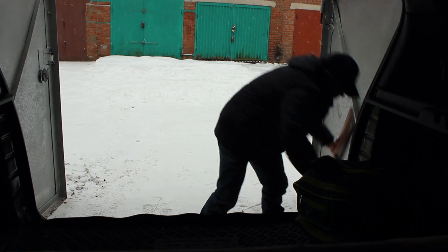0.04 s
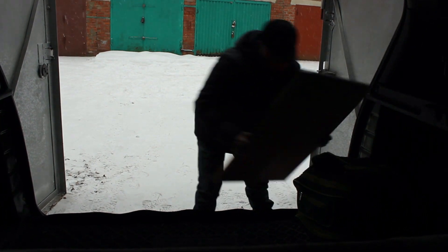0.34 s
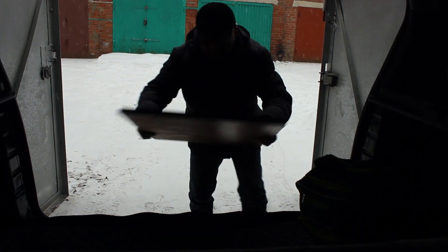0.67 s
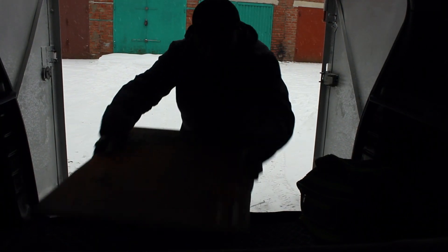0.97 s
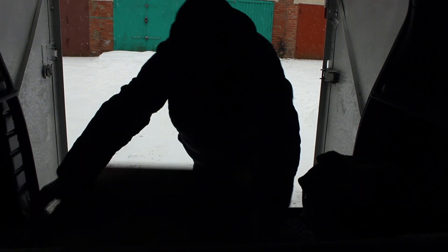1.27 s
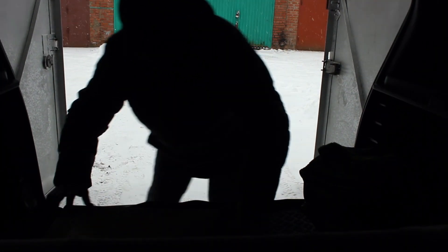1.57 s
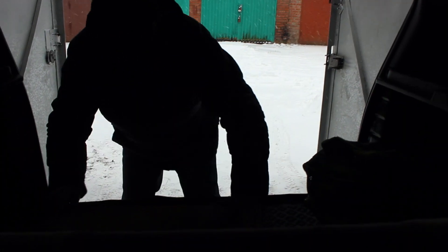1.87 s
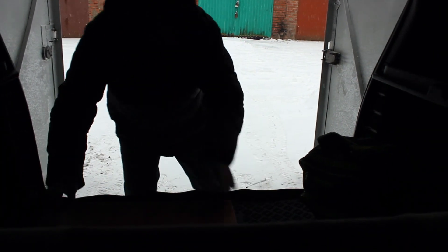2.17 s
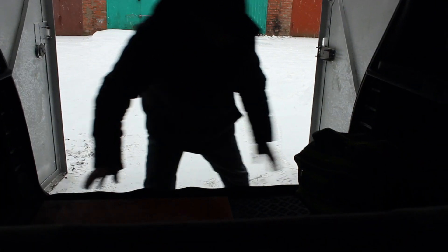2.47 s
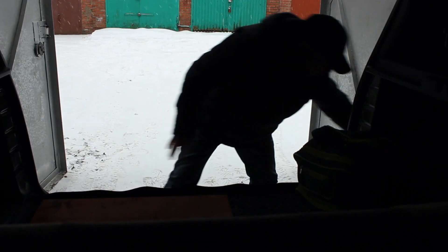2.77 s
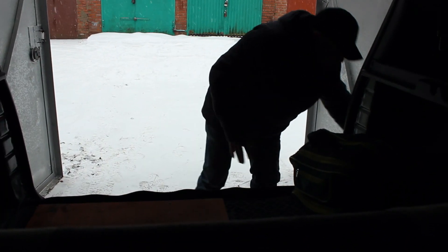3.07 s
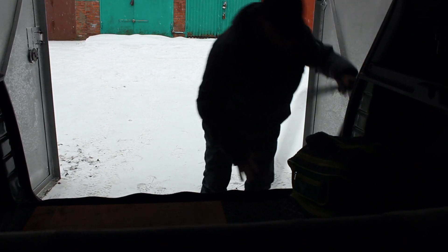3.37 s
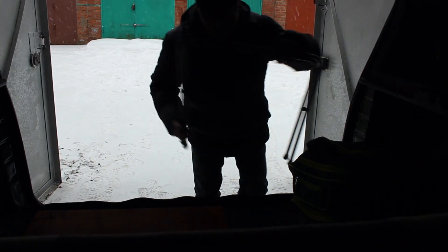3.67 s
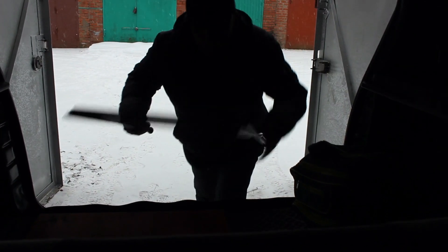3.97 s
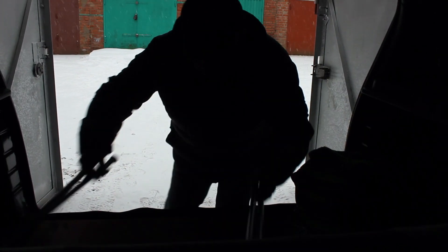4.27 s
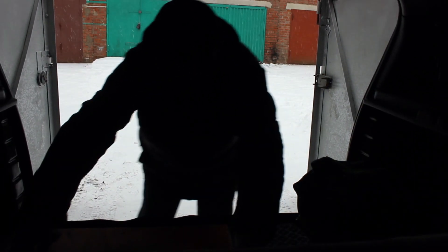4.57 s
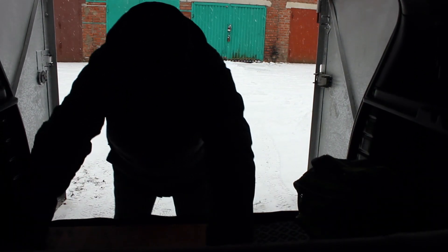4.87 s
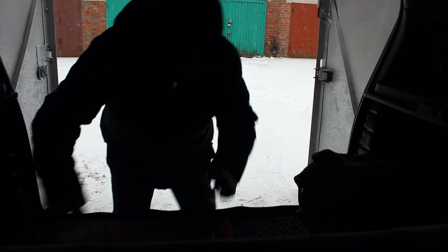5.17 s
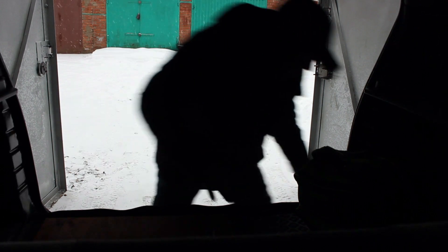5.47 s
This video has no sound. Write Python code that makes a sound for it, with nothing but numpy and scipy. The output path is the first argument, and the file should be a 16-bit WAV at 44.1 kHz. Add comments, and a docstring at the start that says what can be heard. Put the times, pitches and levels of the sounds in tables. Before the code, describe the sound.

From inside a van's cargo bay, over a low outdoor hush, someone is heard stepping on snow in a swishing nylon jacket. A plywood board booms on the floor, bounces and scuffs forward as the van rumbles and settles. After more steps, a folding steel frame clinks lightly in the hand, then lands on the wood with sharp clatters and a scrape. Close walls add a quick echo.

```python
"""Boots crunch on packed snow and a padded nylon jacket rustles, heard from inside a van's cargo bay.
A man drops a plywood board, which booms on the floor and shakes the van, then shoves it in so it judders.
He fetches a folding steel frame: its legs clink in his hands, then scrape and clatter on the board.
The close walls add a short echo, and the hardest blows overload the microphone."""
import sys
import numpy as np
from scipy import signal
from scipy.fft import rfft, irfft, next_fast_len
from scipy.io import wavfile

SR = 44100
rng = np.random.default_rng(int(sys.argv[2]) if len(sys.argv) > 2 else 0)


def generate_wav(signal):
    """Clip the signal to [-1, 1] and save it as 16-bit WAV at the path in sys.argv[1]."""
    frames = np.transpose(np.atleast_2d(signal))
    scaled = np.clip(frames, -1, 1) * 32767
    pcm = np.round(scaled).astype(np.int16)
    wavfile.write(sys.argv[1], SR, pcm)


N = 243873
TIME = np.arange(N) / SR
AGE = np.arange(SR // 4) / SR  # seconds since a contact
# Levels in dB are relative: the functions add their own gains. A fade time (t60) is a fall of 60 dB.

# The tone colour of each kind of noise. Each row: frequency in Hz, level in dB.
AIR_COLOUR = [(20, 11), (44, -31), (60, -9.5), (76, 11.5), (100, -7.5), (140, -3.5), (300, 0.5), (500, 0.5),
              (1030, -9), (1600, -2), (4200, -15.5), (8000, -15), (14000, -14), (16000, -30)]
HISS_COLOUR = [(1000, -30), (3500, 3.5), (6500, -2), (11000, -0.5), (16000, -5)]
NYLON_COLOUR = [(200, -6), (500, -8), (1100, -6), (1700, -1.5), (3500, -1.5), (6000, -6), (10000, -11),
                (16000, -15)]
SNOW_COLOUR = [(50, -46), (150, -5.5), (320, 0), (550, 0.5), (1100, -3.5), (1700, -0.5), (3000, -7),
               (7000, -25), (16000, -46.5)]
CREAK_COLOUR = [(60, -88), (160, -17.5), (300, 3), (520, 2), (900, -8), (2000, -69), (6000, -58)]
THUD_COLOUR = [(20, -22), (45, -22), (80, -5), (160, 1), (260, -2), (500, -7), (800, -15), (2000, -45)]
CLACK_COLOUR = [(200, 2.5), (500, -6), (1000, -13.5), (1600, 1.5), (3200, -5), (5000, -13.5), (7000, -19.5),
                (11000, -29), (16000, -26.5)]
GROAN_COLOUR = [(60, -22), (200, -13.5), (290, 3.5), (345, 3.5), (470, -1), (570, -10), (710, -11),
                (900, -10.5), (1300, -8.5), (2200, -40), (5000, -68)]
CLINK_COLOUR = [(900, -27), (1600, 1), (2300, -6), (3400, -1.5), (6000, -4), (9000, -16.5), (16000, -18)]
RUMBLE_COLOUR = [(15, 10), (25, 22), (42, 2.0), (90, 10.5), (250, -5), (500, -29.5), (900, -61)]
# The narrow tone colour of a squeak. Each row: multiple of its pitch, level in dB.
SQUEAK_COLOUR = [(0.5, -30), (0.68, -10), (1, 0), (1.1, -10), (3, -28)]

# How long the bay echoes. Each row: frequency in Hz, fade time in seconds.
ECHO_FADE = [(100, 0.28), (500, 0.15), (2000, 0.071), (12000, 0.06)]
# How wide the echo is. Each row: frequency in Hz, size of the left-right difference over the shared part.
ECHO_WIDTH = [(100, 0.0015), (1000, 0.0085), (4000, 0.057), (9000, 0.91)]
# The echo is weaker in the bass. Each row: frequency in Hz, relative gain.
ECHO_TONE = [(150, 0.23), (1200, 0.82)]

# The natural tones (modes) of the floor, the board, the whole steel frame and one free-hanging leg.
# Each row: pitch in Hz, level in dB, fade time in seconds before damping shortens it.
FLOOR_MODES = [(78, -6, .2), (97, -13, .28), (138, 2, .09), (163, 3, .1), (200, 2, .12), (262, -1, .22),
               (392, -6, .17), (492, -9, .13)]
BOARD_MODES = [(294, -39, 0.079), (338.6, 10, 0.14), (385, -26, 0.044), (456, -9, 0.23), (725, 3.5, 0.09),
               (970, -8, 0.031), (1120, -27, 0.088)]
FRAME_MODES = [(930, -2, 0.037), (1571, 5, 0.03), (1637, -2, 0.009), (1893, 6, 0.023), (2130, -13.5, 0.18),
               (2592, 1, 0.053), (2930, 3.5, 0.021), (3000, -0.5, 0.041), (3290, 6, 0.06), (3744, 0, 0.13),
               (4220, -9.5, 0.16), (4800, -7.5, 0.12), (5164, -16, 0.13), (5500, -13, 0.057),
               (6500, -15, 0.12), (6890, -6.5, 0.079), (8400, -9, 0.037)]
LEG_MODES = [(1655, -3, 0.18), (2700, -11, 0.33), (2676, 1.5, 0.1), (3310, 1, 0.12), (3450, -1, 0.13),
             (4080, -8, 0.46), (4500, -15, 0.075), (5320, -5, 0.2), (5740, -2, 0.098), (6650, -9.5, 0.12),
             (7250, -3, 0.023), (7860, -22.5, 0.2)]

# Four kinds of rubbing. Each row: start in seconds, length in seconds, level in dB.
SOFT_RUSTLES = [(.11, 0.5, -42.5), (.88, 0.33, -43), (1.22, 0.15, -33), (1.39, 0.18, -46),
                (1.72, 0.25, -36.5), (2.05, 0.5, -44), (2.6, 0.25, -49.5), (3.1, .25, -48), (3.45, .4, -53),
                (3.96, 0.93, -44), (5.14, .32, -46)]  # sleeves on the jacket, and a brief hiss trailing the board's landing
NYLON_SWISHES = [(1.289, 0.04, -27), (1.599, 0.068, -41), (2.288, 0.046, -39), (2.327, 0.052, -38),
                 (2.613, 0.085, -37), (2.771, 0.065, -42), (3.213, 0.04, -41), (3.962, 0.088, -34),
                 (4.584, 0.14, -35.5)]  # quick flicks of the cloth
SNOW_GRINDS = [(.12, 0.51, -38.5), (.55, 0.81, -48), (1.42, 0.17, -38), (1.77, 0.18, -33),
               (1.92, 0.37, -47.5), (3.12, 0.63, -50.5), (4.0, 0.45, -55), (4.41, 0.25, -46),
               (5.17, 0.3, -53.5)]  # soles and load grind over snow and grit
FRAME_SLIDES = [(4.25, 0.41, -54), (4.592, 0.14, -40.5), (4.8, 0.21, -34)]  # the frame slides on the plywood

# Snow gives under a boot. Each row: start in seconds, creak level in dB, crunch level in dB.
BOOT_STEPS = [(0.298, -34.5, -40), (.385, -28.5, -51), (0.488, -53, -41.5), (.846, -32, -38),
              (.904, -30, -38.5), (0.954, -27.5, -40), (3.22, -38.5, -42), (3.405, -43, -42.5),
              (3.456, -39.5, -43.5), (3.532, -35.5, -47), (3.668, -59, -54), (3.982, -34, -46),
              (5.507, -37.5, -44.5)]
# Snow, hinges and sliding feet squeak.
# Each row: start in seconds, length in seconds, pitch in Hz, level in dB.
SHORT_SQUEAKS = [(0.576, 0.037, 1940, -37.5), (0.814, 0.0095, 1740, -36), (0.827, 0.015, 1670, -34),
                 (0.996, 0.077, 1540, -40), (2.35, .049, 1750, -41), (2.428, .032, 1840, -35),
                 (3.813, 0.018, 2140, -38), (4.062, 0.026, 2200, -32.5), (4.098, 0.026, 1850, -34),
                 (4.628, 0.048, 1730, -25.5), (4.666, 0.019, 2230, -20.5)]
# Four kinds of short sound. Each row: start in seconds, level in dB.
CRUST_SNAPS = [(0.561, -39), (.66, -29.5), (0.759, -34), (2.09, -27), (3.534, -29.5), (3.609, -34.5),
               (3.669, -29.5)]  # the snow crust breaks
GRIT_TICKS = [(1.967, -33.5), (4.807, -45), (4.947, -34.5)]  # grit and fittings tick
DEEP_THUDS = [(0.715, -36.5), (4.561, -17.5), (4.963, -29)]  # a footstep, then the frame knocking on the floor
LEG_CLINKS = [(3.032, -29), (3.093, -22.5), (3.158, -35), (3.816, -43), (4.059, -31), (4.107, -44)]  # the frame is picked up and carried
# The van shakes on its springs. One row: start in seconds, level in dB, fade time in seconds.
BODY_SHAKE = (1.39, -32.5, 2.44)

# The frame strikes the board.
# Each row: start in seconds, thump level in dB, steel level in dB, seconds between bounces.
FRAME_LANDINGS = [(4.5584, -20.5, -19.5, 0.0035), (4.7142, -13, -14, 0.003), (4.722, -19.5, -5.5, 0.0022),
                  (4.737, -42, -11.5, 0.0036), (4.824, -31, -30.5, 0.008), (4.838, -23.5, -31, .005),
                  (4.937, -20, -37, .008), (4.9616, -10, -6.5, 0.0083)]
# Hard drops set a small hinge part singing.
# Each row: start in seconds, pitch in Hz, level in dB, fade time in seconds.
HINGE_PINGS = [(4.736, 10500, -42, .2), (4.970, 10500, -38, .3)]
# The board lands and bounces. Each row: start in seconds, thump level in dB, clack level in dB.
BOARD_LANDINGS = [(1.3696, -6, -8), (1.3726, 6, -7), (1.401, -15, -10), (1.419, -25, -18), (1.47, -15, -24),
                  (1.522, -24.5, -27.5)]
# The shoved board catches and slips. Each row: start in seconds, groan level in dB, scuff level in dB.
BOARD_SLIPS = [(1.298, -29.5, -32), (1.805, -48, -16), (1.823, -16.5, -20), (1.843, -26.5, -20.5),
               (1.881, -18.5, -26.5), (1.987, -18.5, -23.5), (2.17, -31, -33), (2.21, -30, -33),
               (2.229, -31.5, -45)]


def amp(db):
    """Turn decibels into a gain to multiply by."""
    return 10 ** (np.asarray(db) / 20)


def unit(x):
    """Scale a sound to an average (rms) level of 1."""
    return x / np.sqrt(np.mean(x ** 2) + 1e-20)


def along(points, hz):
    """Read between the rows of a (frequency, value) table, with octaves evenly spaced."""
    frequencies, values = np.transpose(points)
    return np.interp(np.log(hz + 1), np.log(frequencies), values)


def filtered(x, response):
    """Multiply each frequency in a sound by response(frequency)."""
    n = x.shape[-1]
    padded = next_fast_len(n + 2048, True)
    hz = np.fft.rfftfreq(padded, 1 / SR)
    return irfft(rfft(x, padded) * response(hz), padded)[..., :n]


def colour(x, spectrum):
    """Give a sound a tone colour, at an average level of 1."""
    return unit(filtered(x, lambda hz: amp(along(spectrum, hz))))


def add(track, start, sound):
    """Mix a sound into a track at a start time in seconds."""
    part = track[max(round(start * SR), 0):][:len(sound)]
    part += sound[:len(part)]


def fade(t60, attack):
    """The level after a hit: a quick rise, then a smooth fall (both times in seconds)."""
    return np.exp(-np.log(1000) * AGE / t60) * (1 - np.exp(-AGE / attack))


def burst(spectrum, t60, attack):
    """A dying puff of noise with the given tone colour."""
    return colour(rng.standard_normal(len(AGE)), spectrum) * fade(t60, attack)


def ring(modes, attack, damping):
    """An object rings, struck at a new spot each time, so its tones vary a little in level and pitch."""
    hz, db, t60 = np.transpose(modes)
    gain = amp(db + 2 * rng.standard_normal(len(hz)))
    signs = (-1) ** np.arange(len(hz))  # neighbouring tones start in opposite directions
    gain *= signs * np.sqrt(2) / np.linalg.norm(gain)
    hz = hz * (1 + .014 * rng.standard_normal(len(hz)))
    waves = np.sin(np.outer(2 * np.pi * hz, AGE))
    decays = np.exp(np.outer(-np.log(1000) * damping / t60, AGE))
    return (gain[:, None] * waves * decays).sum(0) * (1 - np.exp(-AGE / attack))


def grains(rate, spread_db):
    """Tiny random slips of uneven size, about `rate` of them a second."""
    clicks = (rng.random(N) < rate / SR) * rng.standard_normal(N)
    sizes = amp(spread_db * np.clip(rng.standard_normal(N), -2, 2))
    return unit(clicks * sizes)


def strokes(rows, rise_s, fall_s):
    """The level of rubbing: each stroke speeds up, holds and slows to a stop."""
    level = np.zeros(N)
    for start, length, db in rows:
        rising = (TIME - start) / rise_s
        falling = (start + length - TIME) / fall_s
        level += amp(db) * np.clip(np.minimum(rising, falling), 0, 1)
    return level


def bounces(start, db, gap_s, count, loss_db=7.5):
    """The times and levels of a hard contact and its ever weaker bounces."""
    return [(start + k * gap_s, db - k * loss_db) for k in range(count)]


def hush_and_hiss():
    """A low, steady outdoor hush, plus the microphone's own faint hiss, different in each channel."""
    hush = amp(-53) * colour(rng.standard_normal(N), AIR_COLOUR)
    hiss = amp(-63.5) * colour(rng.standard_normal((2, N)), HISS_COLOUR)
    return hush + hiss


def bay_echo(x, echo_db):
    """Add the quick echo of the close walls; left and right differ mainly in the treble."""
    hz, seconds, noise = signal.stft(rng.standard_normal((2, SR // 3)), SR, nperseg=256)
    dying = noise * np.exp(-np.log(1000) * seconds / along(ECHO_FADE, hz)[:, None])
    dying[1] *= along(ECHO_WIDTH, hz)[:, None]
    shared, side = signal.istft(dying, SR, nperseg=256)[1]
    tails = np.array([shared + side, shared - side]) / np.linalg.norm(shared)
    tails = filtered(tails, lambda f: along(ECHO_TONE, f))
    return x + amp(echo_db) * signal.fftconvolve(x[None], tails, axes=1)[:, :N]


def jacket():
    """Nylon rubs on nylon in many tiny slips; a swish starts fast and trails off."""
    rustles = strokes(SOFT_RUSTLES, rise_s=0.066, fall_s=0.11)
    level = np.hypot(amp(-52), rustles)  # the cloth still stirs between moves
    for start, length, db in NYLON_SWISHES:
        progress = np.linspace(0, 1, int(length * SR))
        add(level, start, amp(db) * np.sin(np.pi * progress ** .5) ** 2)
    return level * colour(grains(rate=9000, spread_db=-2), NYLON_COLOUR)


def snow():
    """Crystals crunch under the soles, and the crust gives way with dull creaks and snaps."""
    resting_feet = amp(-60.5)
    pressure = resting_feet + strokes(SNOW_GRINDS, rise_s=0.064, fall_s=0.13)
    fine_grit = grains(rate=1100, spread_db=1.5)
    crumbs = amp(-7.5) * grains(rate=60, spread_db=0.5)
    out = pressure * colour(fine_grit + crumbs, SNOW_COLOUR)
    for start, creak_db, crunch_db in BOOT_STEPS:
        creak = amp(creak_db + 8.5) * burst(CREAK_COLOUR, t60=0.082, attack=0.0057)
        crunch = amp(crunch_db + 6) * burst(CLACK_COLOUR, t60=0.089, attack=0.0015)
        add(out, start, creak + crunch)
    for start, db in CRUST_SNAPS:
        add(out, start, amp(db) * burst(SNOW_COLOUR, t60=0.036, attack=0.0012))
    return out


def squeaks():
    """Surfaces stick and slip at an unsteady rate, giving short, grainy chirps."""
    out = np.zeros(N)
    for start, length, hz, db in SHORT_SQUEAKS:
        spectrum = [(hz * multiple, level) for multiple, level in SQUEAK_COLOUR]
        tone = colour(rng.standard_normal(len(AGE)), spectrum)
        swell = np.hanning(int(length * SR))
        add(out, start, amp(db) * swell * tone[:len(swell)])
    return out


def grit_ticks():
    """Grit and fittings give small, sharp ticks under the load."""
    out = np.zeros(N)
    for start, db in GRIT_TICKS:
        add(out, start, amp(db) * burst(HISS_COLOUR, t60=0.13, attack=0.0001))
    return out


def body_shudder():
    """After the board lands, the van's body rumbles and settles."""
    out = np.zeros(N)
    start, db, t60 = BODY_SHAKE
    rumble = colour(rng.standard_normal(N), RUMBLE_COLOUR)
    add(out, start, amp(db) * rumble * np.exp(-np.log(1000) * TIME / t60))
    return out


def panel_bass_loss(x):
    """Panels push little air below their lowest tone, so the deepest bass drops away."""
    return signal.sosfilt(signal.butter(4, 56, "high", fs=SR, output="sos"), x)


def deep_thuds():
    """Deep, dull thuds, each one low dying tone: a footstep, then the frame knocking on the floor."""
    out = np.zeros(N)
    lowest_hz = FLOOR_MODES[0][0]
    thud = np.sqrt(2) * np.sin(2 * np.pi * lowest_hz * AGE) * fade(t60=0.1, attack=0.0012)
    for start, db in DEEP_THUDS:
        add(out, start, amp(db) * thud)
    return out


def floor_thump():
    """The floor panel booms under one dull slap."""
    boom = ring(FLOOR_MODES, attack=.0015, damping=1.35)
    slap = amp(-2) * burst(THUD_COLOUR, t60=.035, attack=.001)
    return boom + slap


def frame_scrape():
    """Steel feet drag on the wood, and the floor rumbles beneath."""
    rasp = colour(grains(rate=1600, spread_db=0.5), CLACK_COLOUR)
    rumble = amp(-9.5) * colour(rng.standard_normal(N), THUD_COLOUR)
    return strokes(FRAME_SLIDES, rise_s=0.0058, fall_s=0.019) * (rasp + rumble)


def steel_frame():
    """Hinged steel legs clink brightly in the hand, then clatter on the board, which damps them."""
    out = np.zeros(N)
    for start, db in LEG_CLINKS:
        tube = ring(LEG_MODES, attack=.002, damping=1.5)
        tap = burst(CLINK_COLOUR, t60=.075, attack=.002)
        add(out, start, amp(db) * (tube + tap))
    for start, thump_db, steel_db, gap_s in FRAME_LANDINGS:
        knock = ring(FLOOR_MODES[2:], attack=0.002, damping=3.4)  # without the two deepest tones
        thud = amp(-4.5) * burst(THUD_COLOUR, t60=.05, attack=.001)
        wood = amp(steel_db - 6.5) * burst(GROAN_COLOUR, t60=0.029, attack=.001)
        add(out, start, amp(thump_db + 1) * (knock + thud) + wood)
        for when, db in bounces(start, steel_db, gap_s, count=4):
            clang = amp(-1.5) * ring(FRAME_MODES, attack=.0007, damping=2.1)
            clack = amp(2.5) * burst(CLACK_COLOUR, t60=.034, attack=.0008)
            add(out, when, amp(db + 3) * (clang + clack))
    for start, hz, db, t60 in HINGE_PINGS:
        add(out, start, amp(db) * np.sin(2 * np.pi * hz * AGE) * fade(t60, attack=0.00082))
    return out


def plywood_board():
    """Plywood slaps the floor and bounces, and judders in short, rough slips as it is pushed."""
    out = np.zeros(N)
    for start, thump_db, clack_db in BOARD_LANDINGS:
        add(out, start, amp(thump_db + 0.5) * floor_thump())
        for when, db in bounces(start, clack_db, gap_s=0.0035, count=3):
            add(out, when, amp(db + 3) * burst(CLACK_COLOUR, t60=0.041, attack=0.00026))
    for start, groan_db, scuff_db in BOARD_SLIPS:
        wood = amp(-2.5) * ring(BOARD_MODES, attack=.0009, damping=1.6)
        groan = amp(1) * burst(GROAN_COLOUR, t60=.09, attack=.0018)
        scuff = amp(scuff_db + 0.5) * burst(CLACK_COLOUR, t60=0.075, attack=0.00039)
        add(out, start, amp(groan_db + 3) * (wood + groan) + scuff)
    return out


def scene():
    """Mix the quiet background, the load inside the cargo bay and the man at its open doors."""
    background = hush_and_hiss()
    contacts = plywood_board() + steel_frame() + grit_ticks() + deep_thuds() + frame_scrape()
    load = panel_bass_loss(contacts) + body_shudder()
    man = snow() + jacket() + squeaks()
    return background + amp(-0.5) * (bay_echo(load, echo_db=-5) + bay_echo(man, echo_db=-6))


def record(dry):
    """The microphone's right side hears first; loud peaks are flattened and the highest treble is cut."""
    right_lead_s, top_hz = 2.7e-5, 16100
    shift_s = np.array([[-0.5], [0.5]]) * right_lead_s  # left later, right earlier
    stereo = filtered(dry, lambda hz: np.exp(2j * np.pi * hz * shift_s))
    clipped = np.clip(stereo, -1, 1)
    return filtered(clipped, lambda hz: hz < top_hz)


dry = scene()
out = record(dry)
generate_wav(out)
```